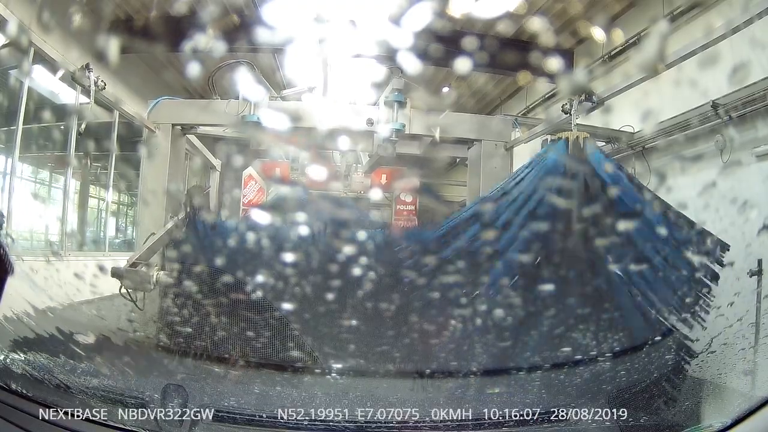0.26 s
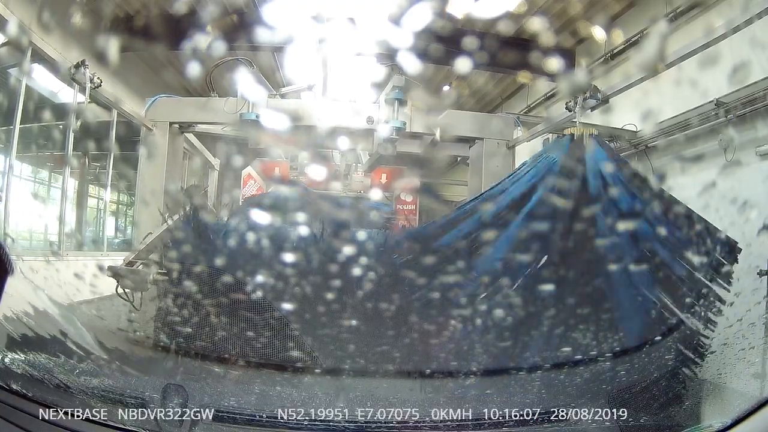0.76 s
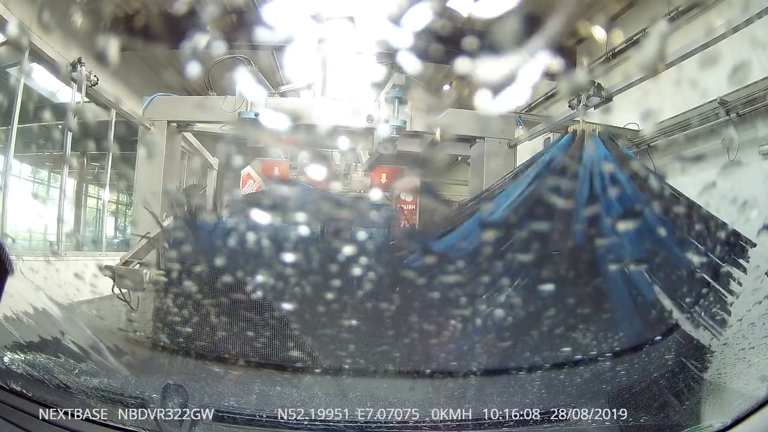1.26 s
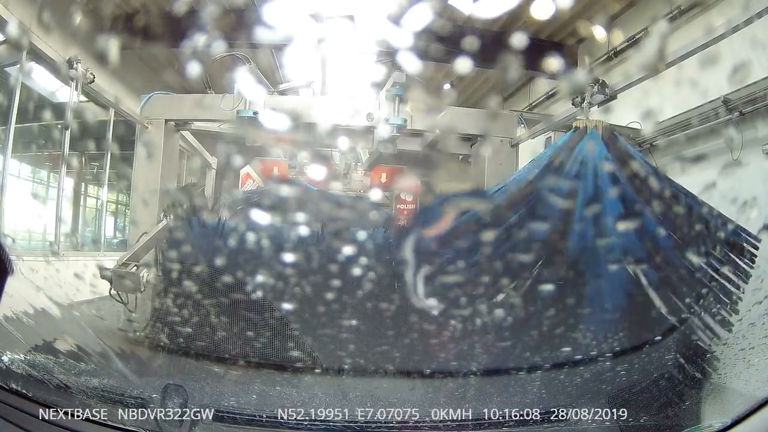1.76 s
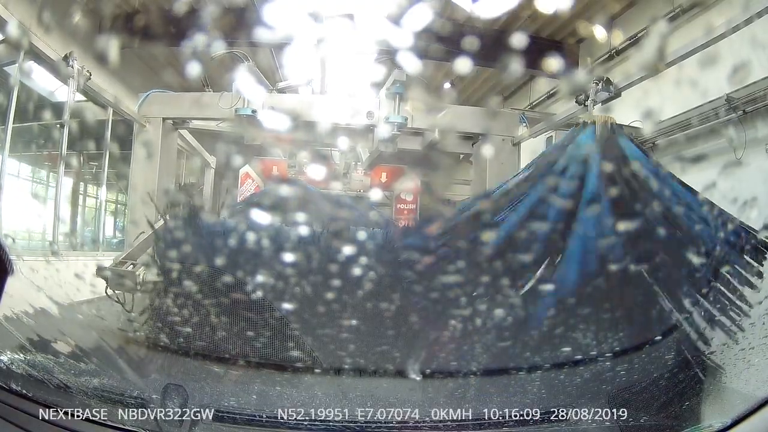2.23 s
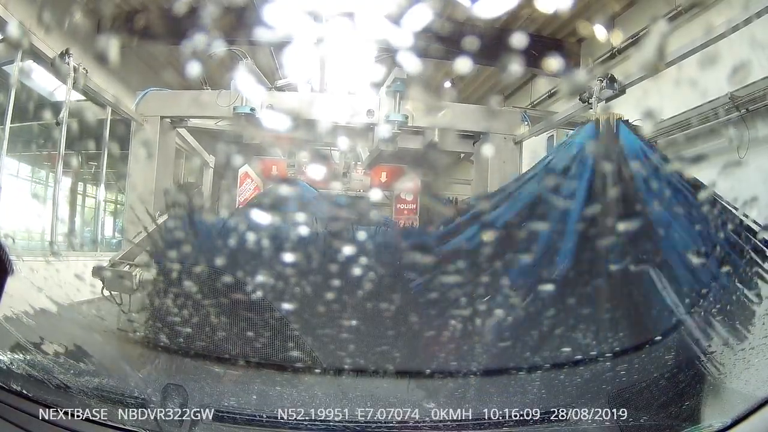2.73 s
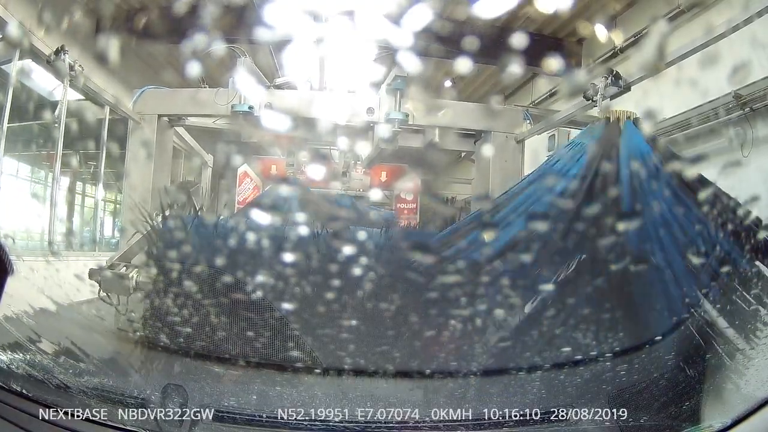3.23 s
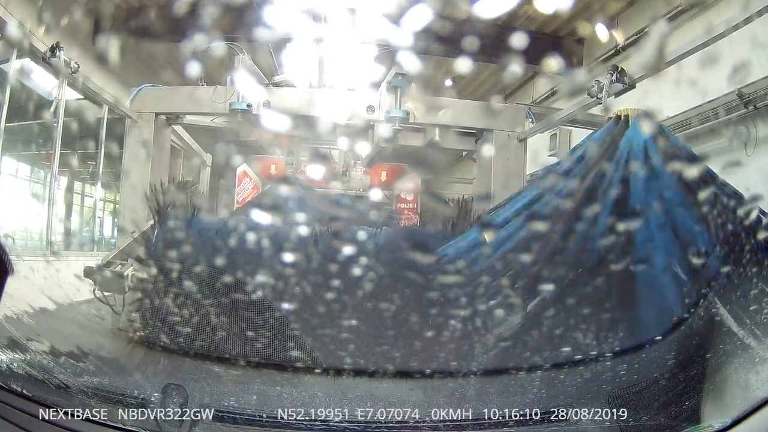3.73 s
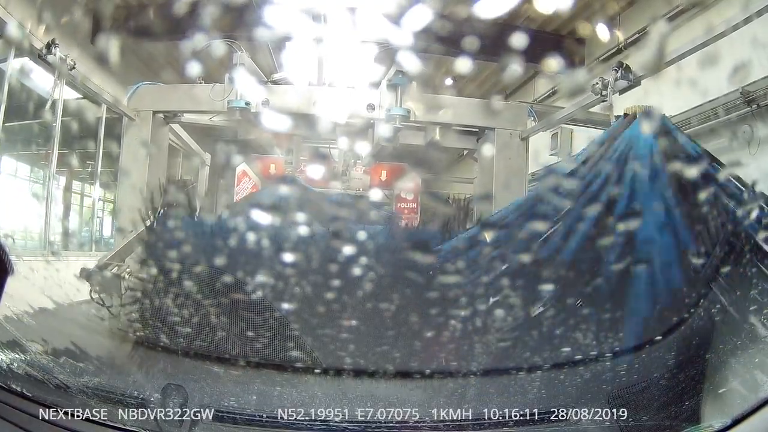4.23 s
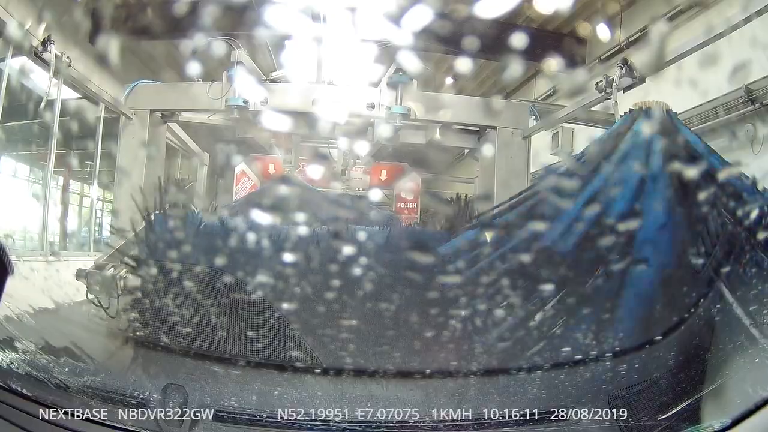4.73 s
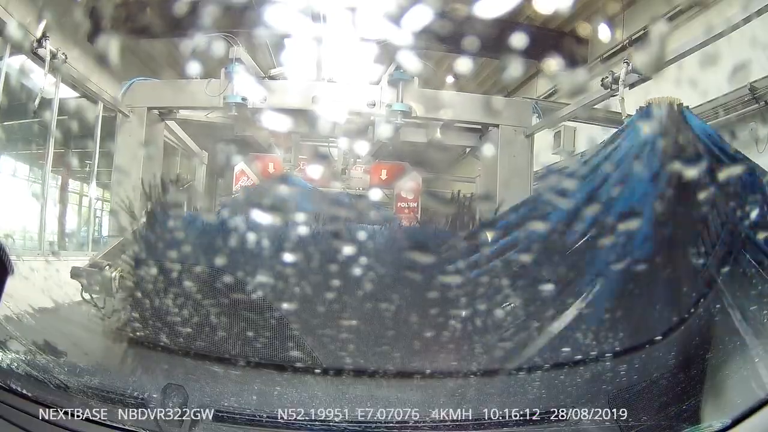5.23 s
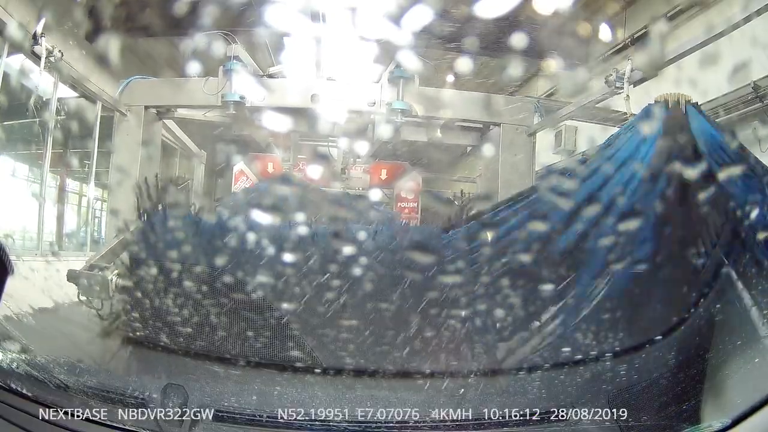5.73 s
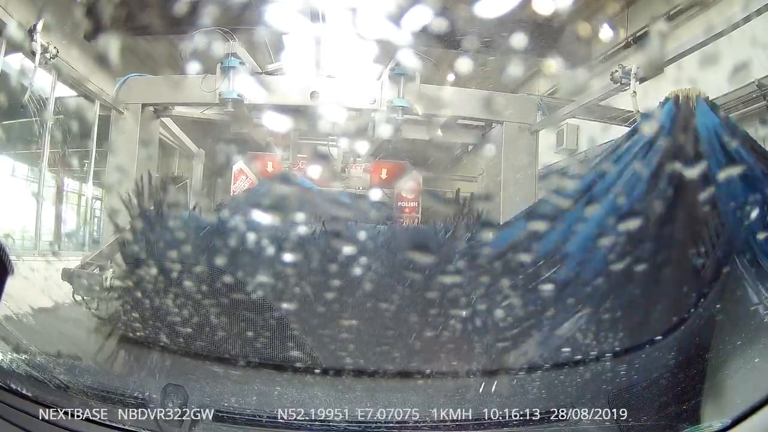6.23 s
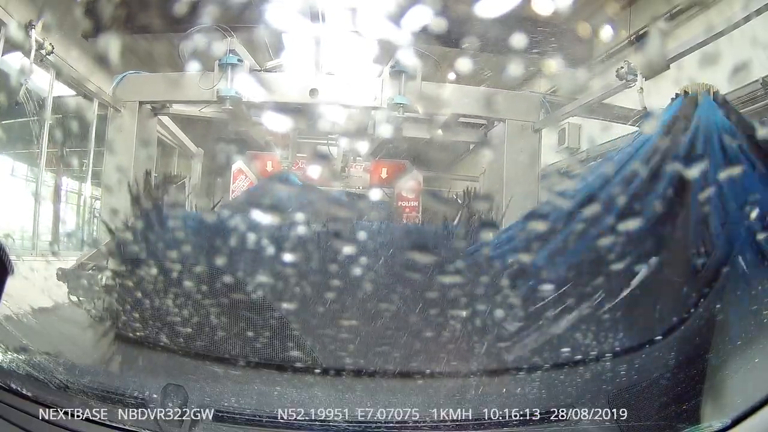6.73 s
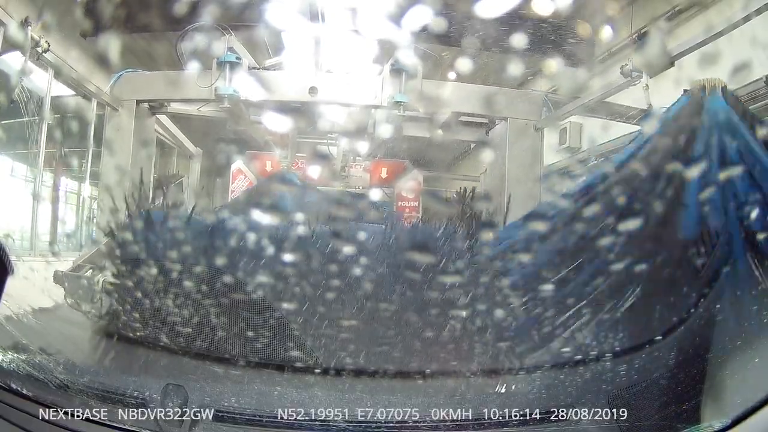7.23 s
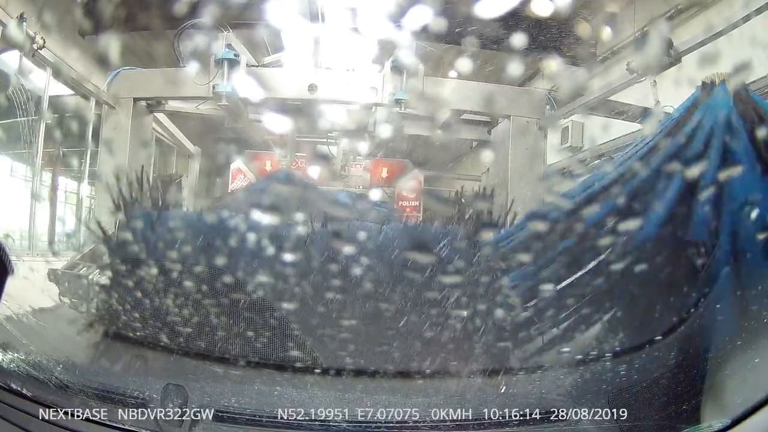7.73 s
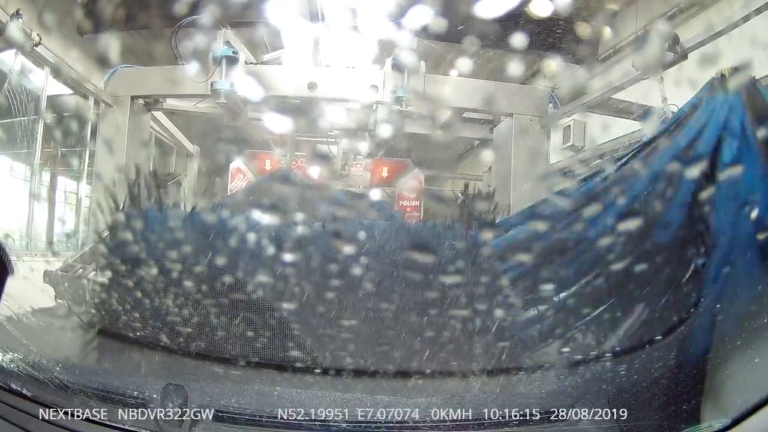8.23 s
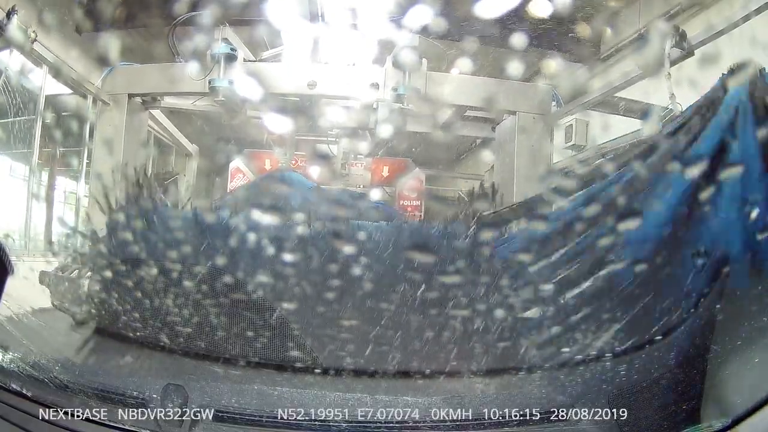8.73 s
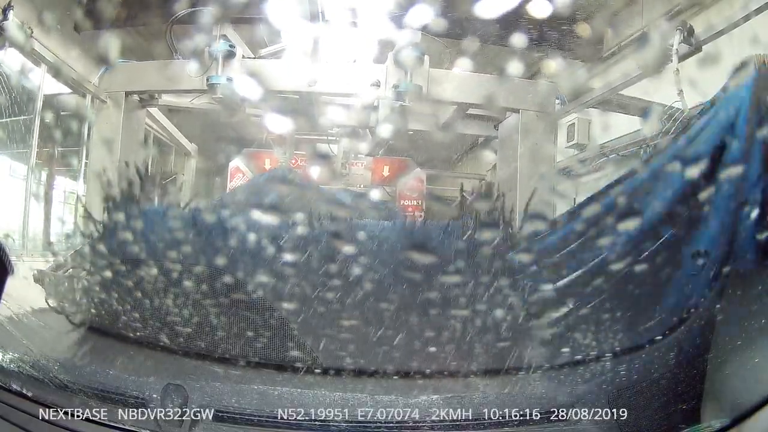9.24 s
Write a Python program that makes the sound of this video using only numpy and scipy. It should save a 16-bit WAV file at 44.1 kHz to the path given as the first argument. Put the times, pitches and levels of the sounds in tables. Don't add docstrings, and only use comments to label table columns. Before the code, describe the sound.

Inside a closed car in a washing hall, a spinning brush beats the bonnet and glass with wet cloth strips. From 0 to 1.4 seconds the slaps are short, irregular and light, several each second, over low floor drumming. From about 1.5 seconds they lengthen and overlap, with hollow metal knocks and thuds, wet smacks and small splashes, growing strongest around 3.5 to 4.5. The brush then stays pressed on: heavy, uneven thumping continues, deep boom surges in the cabin, notably near 4.7 and 6.3, and gritty scrubbing and watery spray swell around 5 to 6. After 8 the clear slaps are sparser and softer, while a loose panel's low hum rises near 9.4. Steady hall rumble and faint jet hiss remain throughout. The small windscreen camera sounds dull, lacking top treble, with a faint, fluttering high whine.

```python
import sys
import numpy as np
from scipy import signal
from scipy.fft import rfft, irfft, next_fast_len
from scipy.io import wavfile
from scipy.ndimage import uniform_filter1d, map_coordinates

SR = 44100
rng = np.random.default_rng(int(sys.argv[2]) if len(sys.argv) > 2 else 0)


def to_linear_factor(level_db):
    exponent = np.asarray(level_db, float) / 20
    return 10 ** exponent


def bounce(signal):
    frames = np.transpose(np.atleast_2d(signal))
    limited = np.clip(frames, -1, 1)
    pcm = np.round(limited * 32767).astype(np.int16)
    wavfile.write(sys.argv[1], SR, pcm)


N = 417627

# start in seconds, peak in dB, thud in dB re peak, splash in dB re peak, dying time in
# seconds.
TIP_SLAPS = [(0.0293, -42, 4, -14, 0.061), (0.0395, -38, 9, -17, 0.066), (0.0667, -32.5, 6, -20, 0.046),
             (0.1361, -38, 7, -22, 0.055), (0.1715, -39.5, 7, -19, 0.047), (0.1925, -30.5, 2, -21, 0.061),
             (0.2364, -40.5, 8, -23, 0.05), (0.2713, -38.5, 12, -21, 0.069),
             (0.3222, -30.5, -3, -20, 0.041), (0.3606, -38, 4, -15, 0.055), (0.376, -28, 2, -22, 0.046),
             (0.4479, -38, -1, -26, 0.055), (0.5591, -44, 3, -21, 0.055), (0.5911, -36, -1, -23, 0.058),
             (0.6914, -34, 7, -19, 0.04), (0.7088, -38, 11, -18, 0.062), (0.7402, -31, 4, -23, 0.055),
             (0.7462, -37.5, 7, -29, 0.055), (0.7976, -36, 8, -16, 0.065), (0.818, -30, 2, -29, 0.053),
             (0.8679, -36, -1, -14, 0.062), (0.8679, -34.5, -6, -25, 0.055), (0.9682, -37, 11, -30, 0.06),
             (0.9716, -35, 4, -27, 0.065), (0.9936, -31, 3, -19, 0.055), (1.0064, -28.5, -2, -16, 0.096),
             (1.032, -30.5, -1, -18, 0.055), (1.203, -34, 5, -26, 0.037), (1.2331, -33, 5, -19, 0.055),
             (1.3094, -36.5, 7, -27, 0.081)]
LENGTH_SLAPS = [(1.54, -34.5, -2, -16, 0.1), (1.5915, -31.5, -4, -17, 0.096),
                (1.695, -36.5, 8, -13.5, 0.16), (1.717, -34, 5, -16, 0.12), (1.8105, -39.5, -3, -14, 0.1),
                (1.8333, -33, 1.5, -13.5, 0.087), (1.8767, -41, 5, -16, 0.11),
                (1.9062, -31.5, 4, -18, 0.087), (1.9491, -37, -2, -16, 0.086), (2.0189, -33, -5, -15, 0.1),
                (2.1002, -40.5, -1, -9.5, 0.1), (2.1217, -33.5, -3, -12, 0.1),
                (2.1681, -38.5, 5, -8, 0.074), (2.221, -39, -5, -17, 0.093), (2.2898, -34, -6, -14, 0.09),
                (2.4336, -31.5, -1, -12, 0.13), (2.5747, -40, 5.5, -8.5, 0.14),
                (2.627, -38, 1.5, -14, 0.1), (2.7458, -37, -1, -18, 0.093), (2.7572, -33.5, -3, -20, 0.1),
                (2.86, -39.5, 14, -23, 0.1), (2.8805, -40, 7, -17, 0.1), (2.9244, -33.5, 1, -20, 0.11),
                (2.9713, -29, -8, -21, 0.13), (2.988, -29, 2, -11, 0.088), (3.0556, -32.5, 6, -16, 0.14),
                (3.096, -27, 1, -14.5, 0.07), (3.1618, -35, 0.5, -15, 0.11), (3.222, -33, 5, -21, 0.12),
                (3.2516, -31.5, 1, -21, 0.068), (3.295, -30.5, 0, -19, 0.085), (3.394, -37, 8, -17, 0.12),
                (3.4482, -33, 5, -19, 0.14), (3.4876, -31.5, -1, -15, 0.11), (3.516, -25, -2, -24, 0.13),
                (3.5474, -30.5, 0, -20, 0.067), (3.6113, -26.5, -3, -19, 0.085),
                (3.6447, -26.5, 3.5, -16.5, 0.14), (3.724, -34, -6, -13, 0.075), (3.783, -22, 3, -22, 0.1),
                (3.8543, -30.5, 3, -20.5, 0.13), (3.899, -28, -1, -19, 0.1), (3.9246, -30, -3, -21, 0.089),
                (4.0289, -38, -4, -17, 0.11), (4.0483, -36.5, 7, -19, 0.11), (4.0867, -34, 5, -23, 0.16),
                (4.1137, -28, 3.5, -16.5, 0.1), (4.184, -29, -3, -22.5, 0.1), (4.2074, -31, 1, -22, 0.15),
                (4.2389, -30.5, -7.5, -22, 0.12), (4.275, -25, 0.5, -26, 0.076),
                (4.3377, -32.5, 2, -25, 0.087), (4.3796, -33.5, -1, -13, 0.089),
                (4.408, -25.5, 0, -18.5, 0.12), (4.4315, -25.5, -7, -14.5, 0.13),
                (4.5752, -35, 7, -26, 0.13), (4.6171, -30, 0, -17, 0.12), (4.6375, -31.5, -2, -23, 0.082),
                 (4.692, -35.5, 7, -29, 0.072), (4.774, -23.5, 0, -23, 0.12), (4.844, -36, 2, -31, 0.082),
                 (4.894, -36, 6, -18, 0.13), (4.9346, -29, 4, -19, 0.067), (5.0201, -39, 0, -26, 0.1),
                 (5.0775, -28.5, 3, -23, 0.11), (5.1299, -32, 0, -18, 0.1), (5.1638, -37, 3, -21, 0.1),
                 (5.1888, -31.5, 4, -13, 0.1), (5.2142, -35, 4, -19.5, 0.11),
                 (5.3165, -45.5, 8, -21, 0.083), (5.3534, -27, -7, -17, 0.17), (5.397, -29, 2, -16.5, 0.16),
                 (5.4857, -30.5, 8, -23, 0.096), (5.546, -30, 6, -17, 0.12), (5.5708, -26, 2.5, -18, 0.058),
                 (5.634, -49, 6, -14.5, 0.09), (5.6562, -30, 11, -15, 0.094), (5.6856, -21, -9, -16, 0.079),
                 (5.757, -30, -12, -18, 0.1), (5.8094, -28.5, 2, -22, 0.13), (5.8847, -38.5, 13, -16, 0.09),
                 (5.9206, -31.5, 5, -21, 0.11), (6.055, -32.5, 7, -20, 0.1), (6.113, -34.5, 8.5, -24, 0.11),
                 (6.15, -31, -6, -28.5, 0.1), (6.192, -37, 12.5, -25.5, 0.12),
                 (6.2656, -30.5, -2, -19.5, 0.13), (6.3137, -36, 4, -21, 0.088),
                 (6.417, -42, 6, -25, 0.088), (6.4454, -31, 1, -18, 0.1), (6.504, -35, 10, -17, 0.14),
                 (6.5996, -26.5, 2, -22, 0.1), (6.6544, -35, 4, -20, 0.12), (6.6799, -34, 4, -26, 0.1),
                 (6.7432, -31.5, 8, -12, 0.12), (6.812, -35.5, 11, -21, 0.12),
                 (6.8774, -25.5, -4, -19, 0.12), (7.0077, -27, -2, -18.5, 0.15),
                 (7.105, -40.5, 11, -28, 0.076), (7.1698, -35.5, 8, -11, 0.13),
                 (7.1984, -29, 0, -16, 0.081), (7.2521, -31, 9, -18, 0.12), (7.319, -35, 7, -22, 0.076),
                 (7.3863, -38, 7, -15.5, 0.12), (7.411, -32.5, 6, -16, 0.074),
                 (7.4895, -32.5, 0, -20.5, 0.11), (7.5705, -30, -3, -16, 0.088),
                 (7.6044, -35.5, 3, -22, 0.14), (7.6475, -32, -11, -19, 0.093),
                 (7.6981, -40, -7, -12.5, 0.094), (7.7874, -35.5, -3, -14, 0.088),
                 (7.8273, -33.5, -6, -11, 0.081), (7.911, -32.5, 4, -14, 0.11),
                 (8.0208, -33.5, 4, -12, 0.1), (8.0627, -28, 2, -21, 0.087),
                 (8.1465, -37.5, 13, -20, 0.081), (8.3626, -37.5, 3, -14, 0.1),
                 (8.3925, -35, 6.5, -11, 0.12), (8.4833, -42, 8, -25, 0.076), (8.5601, -32, 2, -24, 0.14),
                 (8.6499, -48, 1, -26, 0.09), (8.7736, -40, 7, -21, 0.1), (8.9906, -34, 10, -20, 0.11),
                 (9.066, -35.5, 6, -26, 0.09), (9.1498, -37, 6, -22, 0.12), (9.2341, -40, 9, -34, 0.11),
                 (9.3, -34.5, 3.5, -27, 0.13), (9.3653, -34, 0, -17, 0.12), (9.3942, -31.5, -1, -17, 0.088)]

# time in seconds, then cabin boom, floor pan, bonnet and panel hum, all in dB.
SHAKE_LEVELS = [(0.0, -39, -31, -34.5, -54), (0.1, -45.5, -29.5, -30, -46), (0.71, -36.5, -36.5, -37, -41),
                (0.81, -28, -35, -36, -41), (1.21, -48, -37, -36, -47), (2.08, -36.5, -32.5, -30.5, -55),
                (2.32, -40.5, -31, -31.5, -45), (2.64, -26.5, -32.5, -32, -43),
                (3.14, -41.5, -30, -32.5, -45), (3.27, -25.5, -32.5, -32, -44),
                (3.53, -35.5, -33.5, -32.5, -37.5), (3.82, -29.5, -29.5, -27.5, -39),
                (4.19, -30.5, -30, -31, -45), (4.35, -43, -25, -31.5, -48), (4.51, -24.5, -32, -34.5, -39),
                (4.61, -36, -29.5, -29, -49), (4.67, -23, -29, -35.5, -34.5), (4.77, -34, -31.5, -33, -40),
                (5.25, -27.5, -34.5, -31, -48.5), (5.38, -25, -31, -32.5, -38),
                (5.51, -30, -32.5, -31, -40), (5.93, -23.5, -33.5, -29.5, -46),
                (6.09, -32.5, -32.5, -32, -43), (6.25, -17.5, -34.5, -29, -36.5),
                (6.33, -27.5, -33.5, -30.5, -42.5), (6.8, -23.5, -35, -32, -32),
                (6.86, -30.5, -32.5, -31, -36), (9.34, -33, -29.5, -31, -28), (9.39, -31, -31, -30.5, -24),
                (9.47, -32, -32, -32, -31)]

# time in seconds, dull scrub in dB, spray in dB.
SCRUB_LEVELS = [(0.0, -42.5, -59.5), (0.69, -46.5, -68.5), (1.0, -47.5, -57), (1.58, -43, -53.5),
                (1.69, -43.5, -51), (4.3, -40, -48.5), (4.61, -41, -48.5), (5.09, -38, -43),
                (5.64, -34, -44), (8.17, -41, -49), (9.23, -37, -47.5), (9.47, -43, -50)]

# frequency in Hz, level in dB per Hz.
BODY_COLOUR = [(150, -39), (250, -14), (290, -4.5), (328, -7), (382, -1.5), (450, 1), (531, -10),
               (619, -3.5), (733, -7.5), (795, -13.5), (850, -10.5), (1100, -37.5), (1870, -120)]
THUD_COLOUR = [(460, -29.5), (780, -5), (945, 3.5), (1030, -6), (1100, 1), (1290, -0.5), (1600, -6),
               (1870, -4.5), (2020, -20.5), (2380, -15), (2900, -22.5), (3770, -45), (6380, -120)]
SMACK_COLOUR = [(1500, -39.5), (2000, 3.5), (2500, 0.5), (3000, -3.5), (3900, -1.5), (4600, -9.5),
                (5500, -36.5)]
SPLASH_COLOUR = [(3800, -36.5), (4500, -3), (5500, -4.5), (7200, -9.5), (9000, -23)]
PAN_COLOUR = [(41, -30.5), (70, -2), (119, -1.5), (167, 0), (204, -1.5), (242, -8.5), (260, -5.5),
              (340, -35), (570, -120)]
SPRAY_COLOUR = [(1120, -30.5), (1900, 0), (2030, -2), (3030, -9.5), (3920, -8.5), (5200, -17.5),
                (5820, -20), (6970, -23.5), (9060, -56.5), (15300, -120)]
HALL_COLOUR = [(20, -7.5), (45, -10), (90, -61.5), (1500, -66.5), (2500, -56.5), (7300, -58.5)]


def unit(x):
    return x / np.sqrt(np.mean(x ** 2) + 1e-20)


def curves(rows):
    s, *columns = np.transpose(rows)
    t = np.arange(N) / SR
    return [np.interp(t, s, column) for column in columns]


def wobble(rate):
    knots = rng.standard_normal(int(N * rate / SR) + 4)
    return map_coordinates(knots, [np.arange(N) * rate / SR])


def filtered(x, response):
    m = next_fast_len(N + SR // 2)
    spectrum = rfft(x, m) * response(np.fft.rfftfreq(m, 1 / SR))
    return irfft(spectrum, m)[..., :N]


def colour(points):
    f, db = np.transpose(points)
    return lambda hz: to_linear_factor(np.interp(np.log(hz + 1), np.log(f), db, left=-120, right=-120))


def resonance(centre_hz, width_hz):
    return lambda f: (1j * f * width_hz / (centre_hz ** 2 - f * f + 1j * f * width_hz)) ** 2


def rush(response, patchy_db, gritty_db=0):
    grit = rng.standard_normal(N) * to_linear_factor(gritty_db * wobble(500))
    z = signal.stft(grit, nperseg=512)[2]
    patches = uniform_filter1d(rng.standard_normal(z.shape), 5, 0)
    patches = unit(uniform_filter1d(patches, 5, 1))
    patchy = signal.istft(z * to_linear_factor(patchy_db * patches), nperseg=512)[1][:N]
    return unit(filtered(patchy, response))


def steady(x, calm):
    envelope = np.abs(signal.hilbert(x, next_fast_len(N))[:N])
    return unit(x / (envelope + 0.13) ** np.clip(calm, 0, 1))


def burst(length_s, rise):
    t = np.arange(SR // 4) / SR / length_s
    return (1 - np.exp(-(t / rise) ** 2)) * to_linear_factor(-60 * t)


def slaps():
    power = np.zeros((4, N + SR))
    for s, db, thud_db, splash_db, life in TIP_SLAPS + LENGTH_SLAPS:
        life = np.clip(life, 0.02, 0.4)
        knock, thud = burst(1.6 * life, 0.044), burst(1.32 * life, 0.052)
        smack, splash = burst(0.88 * life, 0.096), burst(0.97 * life, 0.07)
        gains = to_linear_factor(db + np.array([thud_db - 2, thud_db - 2, -2.5, splash_db + 3]))
        at = max(round((s - 0.043 * life) * SR), 0)
        power[:, at:at + SR // 4] += (gains[:, None] * [knock, thud, smack, splash]) ** 2
    fibres = unit(to_linear_factor(3.5 * wobble(260)))
    metal = [rush(colour(BODY_COLOUR), 1.3), rush(colour(THUD_COLOUR), 2.8)]
    cloth = [rush(colour(SMACK_COLOUR), 2.1, 0.58), rush(colour(SPLASH_COLOUR), 1.8, 0.96)]
    return fibres * np.sum(np.sqrt(power[:, :N]) * (metal + cloth), axis=0)


def shell():
    boom_db, pan_db, bonnet_db, hum_db = curves(SHAKE_LEVELS)
    pan = to_linear_factor(pan_db + 0.33) * rush(colour(PAN_COLOUR), 0.99)
    bonnet = to_linear_factor(bonnet_db - 0.6 + 0.8 * wobble(20)) * rush(colour(BODY_COLOUR), 1.5)
    cabin_air = rush(resonance(centre_hz=41.5, width_hz=17.7), 0)
    boom = to_linear_factor(boom_db + 0.65) * steady(cabin_air, 0.48)
    loose_panel = rush(resonance(centre_hz=300, width_hz=20), 0)
    hum = to_linear_factor(hum_db - 1.5) * steady(loose_panel, 0.35)
    return pan + bonnet + boom + hum


def scrub():
    dull_db, spray_db = curves(SCRUB_LEVELS)
    flutter_db = 1.5 * wobble(60) + 1.4 * wobble(25)
    dull = to_linear_factor(dull_db - 1.25 + flutter_db) * rush(colour(THUD_COLOUR), 1.5, 1.8)
    spray = to_linear_factor(spray_db - 3.5 + 2 * flutter_db) * rush(colour(SPRAY_COLOUR), 2.1, 1.1)
    return dull + spray


def whine():
    frame_hz = 30
    since = (np.arange(N) / SR * frame_hz + 0.5) % 1
    sag_shape = (1 - np.exp(-since / 0.08)) * np.exp(-since / 0.4)
    sag_hz = 300 * (1 + 0.35 * wobble(12)) * sag_shape
    hz = 5960 - sag_hz + 35 * wobble(150)
    level = to_linear_factor(-64.5 + 1.7 * wobble(60))
    return level * np.sin(2 * np.pi * np.cumsum(hz) / SR)


def tunnel():
    return to_linear_factor(-40) * rush(colour(HALL_COLOUR), 0)


def scene():
    return (slaps() + shell() + scrub() + whine() + tunnel())[None]


def top_cut(x):
    return signal.sosfilt(signal.butter(12, 9000, fs=SR, output="sos"), x)


def record(dry):
    top_hz, camera_rate_hz = 7250, 16000
    band = filtered(dry, lambda hz: to_linear_factor(-np.clip((hz - top_hz) * 0.6, 0, 60)))
    mirrored = band * np.cos(2 * np.pi * camera_rate_hz * np.arange(N) / SR)
    mirror = filtered(mirrored, colour([(8700, -47.5), (8790, -17.5), (8900, -27), (9050, -43.5)]))
    return top_cut(band + mirror)


dry = scene()
out = record(dry)
bounce(out)
```